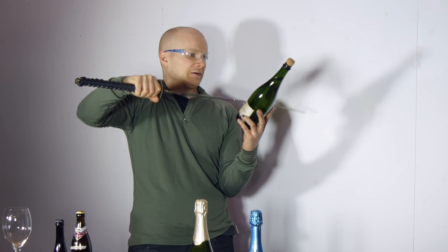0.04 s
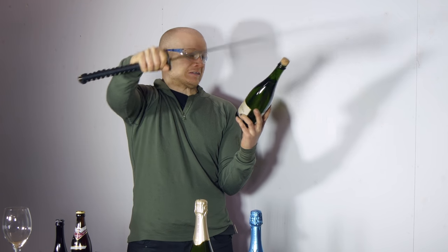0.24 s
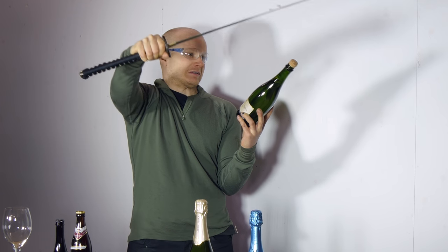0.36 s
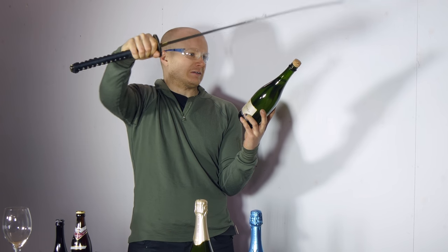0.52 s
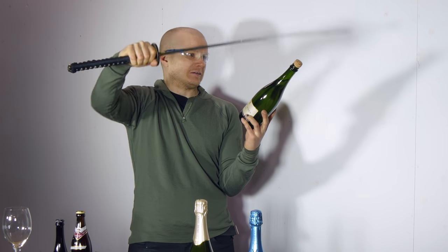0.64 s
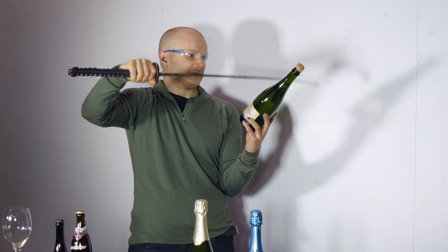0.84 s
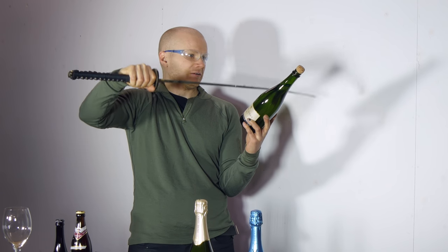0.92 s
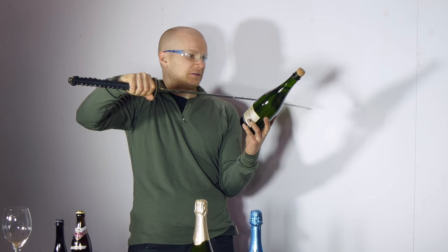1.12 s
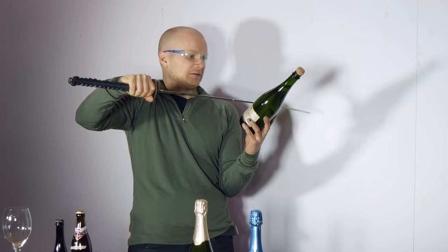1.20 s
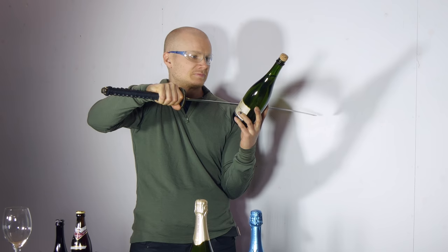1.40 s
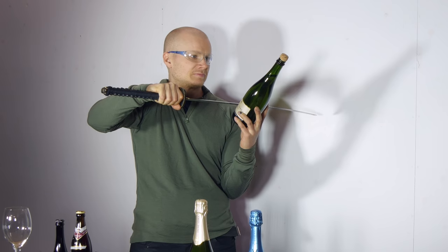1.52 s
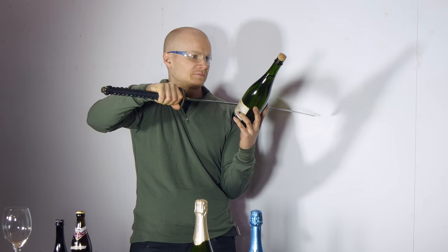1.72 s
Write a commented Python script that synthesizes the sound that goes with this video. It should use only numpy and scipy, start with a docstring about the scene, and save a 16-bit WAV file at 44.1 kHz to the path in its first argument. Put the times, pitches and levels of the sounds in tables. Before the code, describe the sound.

A sword pops the top off a sparkling wine bottle, with a short ringing tail.

```python
"""Opening sparkling wine with a sword

In a quiet, echoing room, a blade slides up a bottle and cracks the glass collar. Gas spits through
the crack, the top pops off, and the gas in the open neck hoots with a rising pitch.
Glass and steel ring on, and a few faint clinks and rubs follow as they come to rest."""
import sys
import numpy as np
from scipy import signal
from scipy.fft import rfft, irfft
from scipy.io import wavfile
from scipy.ndimage import uniform_filter1d

SR = 44100
rng = np.random.default_rng(int(sys.argv[2]) if len(sys.argv) > 2 else 0)


def dump_mix(stems):
    """Bounce the given channels to the path in sys.argv[1] as a 16-bit WAV at rate SR."""
    frames = np.atleast_2d(stems).T  # one column per channel
    limited = np.clip(frames, -1, 1)  # hard clip at full scale
    pcm = np.round(limited * 32767).astype(np.int16)
    wavfile.write(sys.argv[1], SR, pcm)


N = 77175
T = np.arange(N) / SR
BITE_S, CRACK_S, POP_S = .108, .2045, .2331  # the blade bites, the collar cracks, the top flies off
TOP_HZ = 15780  # upper edge of the treble

# The tones of steel rubbing on glass: pitch_hz, relative_level_db
BLADE_TONES = [(960, -13), (1550, -15), (2470, -3), (2510, 0), (2890, -11), (4080, -7), (4175, -4),
               (4505, -2), (4550, -6), (5120, -11), (5620, -14), (6030, -7), (6238, -4), (6612, -7),
               (6800, -10), (7530, -13), (8050, -9), (8390, -8), (9660, -13), (10600, -18), (11550, -18),
               (12500, -21), (13300, -21)]


def amp(db):
    """Turn decibels into a number to multiply by."""
    return 10 ** (np.asarray(db) / 20)


def unit(x):
    """Scale a signal so that its average strength (rms) is 1."""
    return x / np.sqrt(np.mean(x ** 2))


def level_curve(points):
    """A loudness that changes over time, joining up rows of time_s, level_db."""
    return amp(np.interp(T, *np.array(points).T))


def at_pitch(hz, rows, column=1):
    """Read between the rows of a table by pitch, giving every octave equal space."""
    rows = np.array(rows, float)
    return np.interp(np.log(np.maximum(hz, 1)), np.log(rows[:, 0]), rows[:, column])


def noise(spectrum):
    """Noise of strength 1, coloured by rows of pitch_hz, relative_level_db."""
    gains = amp(at_pitch(np.fft.rfftfreq(N, 1 / SR), spectrum))
    return unit(irfft(rfft(rng.standard_normal(N)) * gains, N))


def pulse(start_s, spectrum, size=2048):
    """One sharp push of air with energy 1 and the given mix of low and high pitches."""
    log_gains = np.log(amp(at_pitch(np.fft.rfftfreq(size, 1 / SR), spectrum)))
    cepstrum = irfft(log_gains)
    # Folding the second half onto the first packs the energy at the start of the pulse.
    cepstrum[1:size // 2] *= 2
    cepstrum[size // 2 + 1:] = 0
    shape = irfft(np.exp(rfft(cepstrum)))
    return np.pad(shape / np.linalg.norm(shape), (int(start_s * SR), N))[:N]


def narrow_noise(hz, width_hz):
    """Noise of strength 1 gathered around one pitch; the narrower, the more like a note."""
    peak = signal.iirpeak(hz, hz / width_hz, fs=SR)
    return unit(signal.lfilter(*peak, rng.standard_normal(N)))


def fade(start_s, fade_s):
    """Stay at 1 until start_s, then fall by 60 dB every fade_s."""
    return np.exp(-np.log(1000) * np.maximum(T - start_s, 0) / fade_s)


def struck(start_s, fade_s):
    """Silence, then a sudden start that fades away."""
    return (T >= start_s) * fade(start_s, fade_s)


def ring(start_s, hz, db, fade_s):
    """One pure tone that starts suddenly and fades away."""
    return amp(db) * np.sin(2 * np.pi * hz * (T - start_s)) * struck(start_s, fade_s)


def wander(changes_per_s):
    """A smooth random wobble of strength 1."""
    span = max(int(SR / changes_per_s), 1)
    return unit(uniform_filter1d(uniform_filter1d(rng.standard_normal(N), span), span))


def room_tone():
    """The quiet room has a low, soft rumble of its own."""
    # The colour of the rumble: pitch_hz, relative_level_db
    spectrum = [(20, -6), (40, 1.5), (70, -3), (100, -6), (200, -7), (350, -12.5), (800, -15), (1300, -20),
                (2500, -26), (5000, -33.5), (15500, -30.5)]
    # Its loudness over time: time_s, level_db
    levels = [(0, -61), (1.0, -63), (1.45, -65), (1.6, -67), (1.75, -66.5)]
    return level_curve(levels) * noise(spectrum)


def blade_touch():
    """The first light skim on the glass sounds only the blade's strongest tone, until it bites."""
    start_s, level_db = .036, -66
    hz = max(BLADE_TONES, key=lambda row: row[1])[0]
    return amp(level_db) * np.sin(2 * np.pi * hz * T) * (T >= start_s) * fade(BITE_S, .1)


def blade_slide():
    """Rubbing makes the blade sing unsteadily over fine grit; its low tones join as it bites."""
    # Loudness as the blade presses on the glass: time_s, level_db
    pressure = [(.05, -85.5), (.075, -54), (.094, -52.5), (.097, -45.5), (.112, -48), (.125, -46.5),
                (.155, -48), (.17, -46), (.204, -49)]
    # The colour of one tiny slip: pitch_hz, relative_level_db
    grit_spectrum = [(300, -7.5), (1000, 0.5), (3000, -1.5), (6000, -8.5), (9000, -8), (13000, -16),
                     (16000, -18.5)]
    pitch_waver, flutter_db = .007, 4.5
    bright_hz, boost_db, drop_db_per_octave = 6600, 2, 8
    slips_per_s, slip_spread_db, grit_db = 12000, 3, -8
    before_bite = fade(BITE_S, .02)
    song = 0
    for hz, db in BLADE_TONES:
        pitch = hz * (1 + pitch_waver * wander(400))
        phase = 2 * np.pi * np.cumsum(pitch) / SR
        tilt_db = before_bite * (boost_db - drop_db_per_octave * abs(np.log2(hz / bright_hz)))
        song += amp(db + tilt_db + flutter_db * wander(80)) * np.sin(phase)
    slipping = rng.random(N) < slips_per_s / SR
    slips = slipping * rng.standard_normal(N) * amp(slip_spread_db * rng.standard_normal(N))
    grit = unit(signal.fftconvolve(slips, pulse(0, grit_spectrum))[:N])
    return (unit(song) + amp(grit_db) * grit) * level_curve(pressure) * fade(CRACK_S, .1)


def collar_crack():
    """The collar cracks and gas spits through the gap, already sounding a faint note in the neck."""
    # The colour of the spitting gas: pitch_hz, relative_level_db
    spectrum = [(60, -37.5), (180, -14), (300, 0.5), (500, -7.5), (800, 1), (1200, 6.5), (1800, -2.5),
                (2400, -4), (2900, 4.5), (3700, -8), (6000, -16.5), (10500, -15), (12000, -24.5),
                (16000, -27.5)]
    spit_db, flutter_db, neck_db = -29, 1.5, -46
    spit = noise(spectrum) * amp(spit_db + flutter_db * wander(240))
    neck = amp(neck_db) * narrow_noise(hz=920, width_hz=30)
    return (spit + neck) * (T >= CRACK_S) * fade(POP_S, .0079)


def pop():
    """The top flies off: a few sharp shocks, a rough blast, a thin squeak and a dying rush of gas."""
    # Shocks as the glass parts and the gas bursts out: start_s, level_db
    shock_hits = [(0.2335, 5.5), (.2344, -10.5), (0.2352, -2), (0.236, -1.5)]
    # The colour of the shocks and the blast: pitch_hz, relative_level_db
    pop_spectrum = [(40, -31.5), (120, -22), (220, -13.5), (300, 1.5), (480, -1.5), (800, 2.5), (1300, 7.5),
                    (1750, -2.5), (2300, -1), (3300, -4.5), (3750, -13), (4300, -11), (5800, -11),
                    (6800, -22.5), (11000, -31), (16000, -35.5)]
    # The colour of the gas rushing out: pitch_hz, relative_level_db
    rush_spectrum = [(250, -8), (420, -4), (900, -3), (1700, -3), (2400, 4), (3700, -7), (4300, -3),
                     (5200, -13.5), (8000, -11.5), (11000, -21.5), (16000, -23)]
    squeak_s, squeak_width_s, squeak_hz = .2432, .0014, 15550
    shocks = -sum(amp(db) * pulse(start_s, pop_spectrum) for start_s, db in shock_hits)
    blast = amp(-9) * noise(pop_spectrum) * struck(POP_S, fade_s=.02)
    rush = amp(-25) * noise(rush_spectrum) * struck(POP_S, fade_s=.15)
    squeak_swell = np.exp(-((T - squeak_s) / squeak_width_s) ** 2)
    squeak = amp(-31) * np.sin(2 * np.pi * squeak_hz * T) * squeak_swell
    return shocks + blast + rush + squeak


def neck_hoot():
    """The gas in the open neck sounds one rising note that stops short."""
    # The loudness of the note: time_s, level_db
    levels = [(.233, -18.5), (0.245, -17), (0.253, -21.5), (0.271, -21), (0.284, -22.5), (0.313, -23.5),
              (.326, -29.5), (.365, -27.5)]
    from_hz, to_hz, pitch_waver = 1145, 1455, .003
    middle_s, rise_s, end_s = .294, .021, .363
    climb = .5 + .5 * np.tanh((T - middle_s) / (2 * rise_s))  # an S-curve from 0 to 1
    pitch = (from_hz + (to_hz - from_hz) * climb) * (1 + pitch_waver * wander(280))
    phase = 2 * np.pi * np.cumsum(pitch * (T >= POP_S)) / SR
    return np.sqrt(2) * np.sin(phase) * level_curve(levels) * fade(end_s, .02)


def glass_and_steel():
    """The pop sets bottle and blade ringing, and gas blows the bottle's notes over a long steel tone."""
    # Notes of the bottle kept going by the rush of gas: pitch_hz, width_hz, level_db, fade_s
    blown_notes = [(658, 25, -29, .35), (2825, 56, -27, .33), (5876, 59, -38, .25), (7306, 100, -42, .25)]
    # Ringing tones of bottle and blade: pitch_hz, level_db, fade_s
    struck_tones = [(295.8, -45.5, 0.45), (642, -45, .9), (2441, -36.5, .35), (2850, -35, 0.23),
                    (3276, -38.5, .3), (4670, -48.5, .35), (5215, -35, .15), (6400, -39.5, .18),
                    (10800, -49.5, .2)]
    blown = sum(amp(db) * narrow_noise(hz, width_hz) * struck(POP_S, fade_s)
                for hz, width_hz, db, fade_s in blown_notes)
    ringing = sum(ring(POP_S, hz, db, fade_s) for hz, db, fade_s in struck_tones)
    steel = ring(CRACK_S, hz=882, db=-64, fade_s=6.7)
    return blown + ringing + steel


def room_thump():
    """The puff of gas stirs a deep note in the room."""
    return ring(POP_S, hz=72, db=-49, fade_s=.3)


def clinks_and_rubs():
    """Blade and bottle clink, rub and shuffle faintly as they come to rest."""
    # Light knocks: start_s, pitch_hz, level_db, fade_s
    clinks = [(.826, 1729, -57, 0.14), (1.429, 2435, -65, .4)]
    # Soft rubs and shuffles: start_s, length_s, pitch_hz, width_hz, level_db
    rubs = [(0.777, 0.025, 190, 119.7, -59), (0.931, .13, 4110, 400, -76), (1.285, 0.13, 2600, 220, -72),
            (1.418, 0.07, 1507, 900, -72)]
    tick_db, twin_db, beat_hz = -2.5, -4, 14.8
    out = np.zeros(N)
    for start_s, hz, db, fade_s in clinks:
        tick = amp(db + tick_db) * narrow_noise(hz, hz / 2) * struck(start_s, .056)
        twin = ring(start_s, hz + beat_hz, db + twin_db, fade_s)  # two close pitches make a wobble
        out += ring(start_s, hz, db, fade_s) - twin + tick
    for start_s, length_s, hz, width_hz, db in rubs:
        progress = np.clip((T - start_s) / length_s, 0, 1)
        swell = np.sqrt(np.abs(np.sin(np.pi * progress)))
        out += amp(db) * swell * narrow_noise(hz, width_hz)
    return out


def room_echo(sound, band_count=18):
    """Reflections in the room build up, then die away, soonest in the high treble."""
    # How long and how loud the room echoes: pitch_hz, fade_s, level_db
    echoes = [(99.6, .5, -9.5), (252, 0.66, -9), (434, 1., -7.5), (686, 0.93, -7), (1210, 0.87, -11),
              (2812, 0.85, -8.5), (4230, 0.67, -5.5), (6000, 0.79, -12.5), (9000, .42, -10.5),
              (16000, .25, -9.5)]
    delay_s, build_s = .0045, .012
    pitches = np.fft.rfftfreq(N, 1 / SR)
    centres = np.geomspace(50, TOP_HZ, band_count)
    spectrum = rfft(rng.standard_normal(N))
    build = 1 - np.exp(-np.maximum(T - delay_s, 0) / build_s)
    response = 0
    for hz, share in zip(centres, np.eye(band_count)):
        band_gains = at_pitch(pitches, np.column_stack([centres, share]))  # 1 here, 0 at the next band
        band = irfft(spectrum * band_gains, N)
        decay = build * fade(0, at_pitch(hz, echoes))
        response += band * decay / np.linalg.norm(decay) * amp(at_pitch(hz, echoes, column=2))
    return signal.fftconvolve(sound, response)[:N]


def scene():
    """Blade, bottle and gas sound with the room's echo over its low rumble, almost in the centre."""
    direct = blade_touch() + blade_slide() + collar_crack() + pop()
    direct += neck_hoot() + glass_and_steel() + clinks_and_rubs()
    bass_cut = signal.butter(2, 120, "high", fs=SR, output="sos")  # the direct sounds carry little bass
    direct = signal.sosfilt(bass_cut, direct)
    heard = direct + room_echo(direct) + room_thump() + room_tone()
    middle_band = signal.butter(2, (250, 1800), "band", fs=SR, output="sos")
    lean = .05 * signal.sosfilt(middle_band, heard)  # middle pitches are a little louder on the left
    return np.array([heard + lean, heard - lean])


def record(dry):
    """Add faint hiss, cut the highest treble and shift the wave by a small, steady offset."""
    # Each channel's own hiss: time_s, level_db
    hiss_levels = [(0, -70.5), (1.4, -67.5), (1.6, -70)]
    offset = -.0037
    hiss = level_curve(hiss_levels) * rng.standard_normal((2, N))
    treble_cut = signal.ellip(10, .2, 80, TOP_HZ, fs=SR, output="sos")
    return offset + signal.sosfilt(treble_cut, dry + hiss)


dry = scene()
out = record(dry)
dump_mix(out)
```